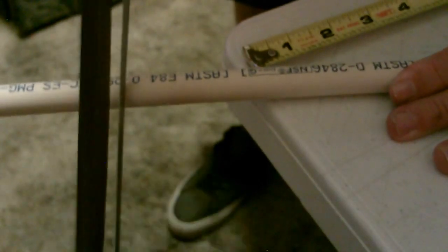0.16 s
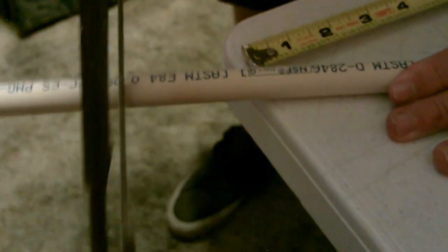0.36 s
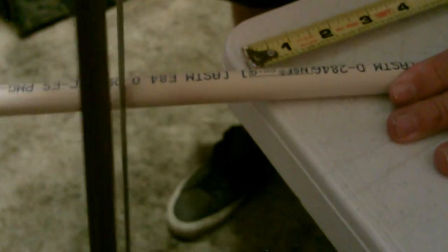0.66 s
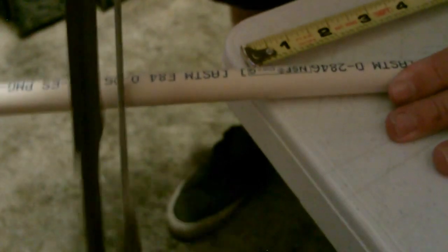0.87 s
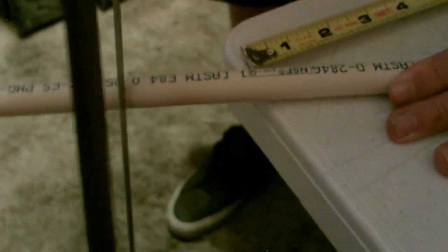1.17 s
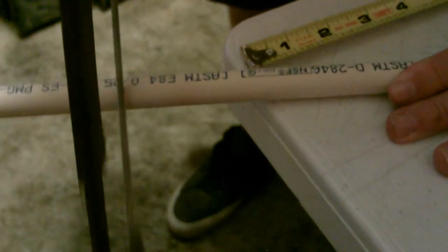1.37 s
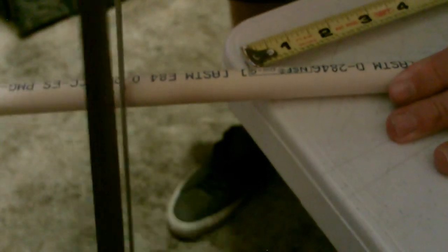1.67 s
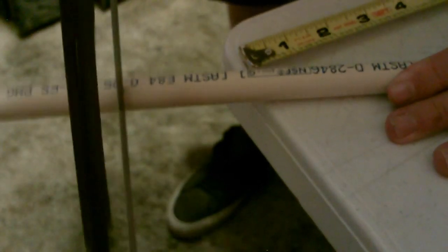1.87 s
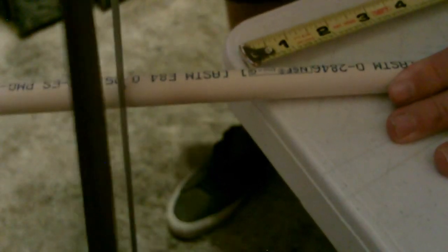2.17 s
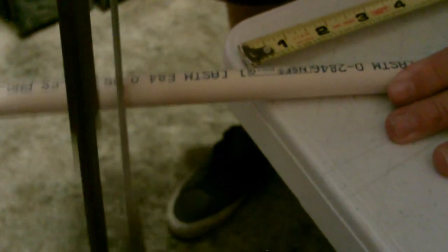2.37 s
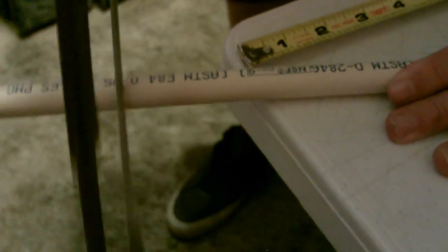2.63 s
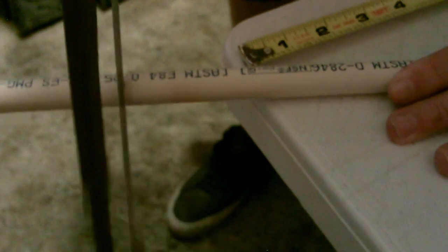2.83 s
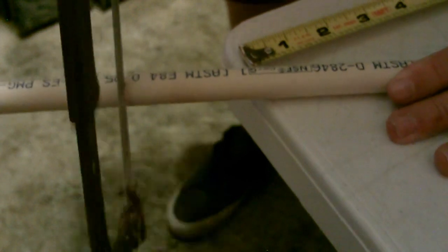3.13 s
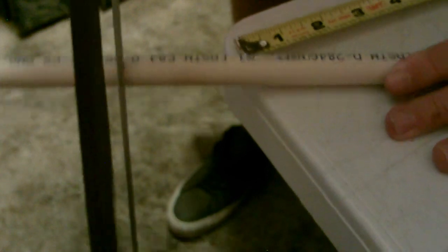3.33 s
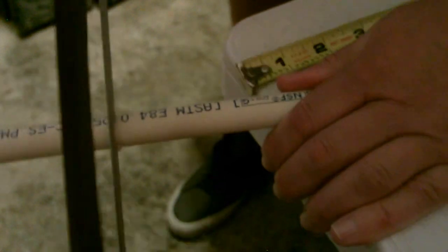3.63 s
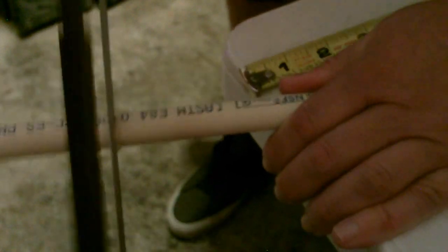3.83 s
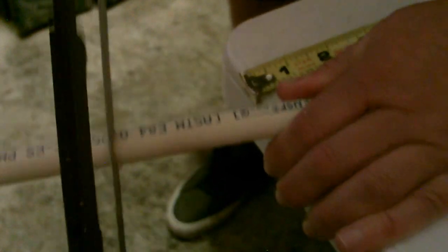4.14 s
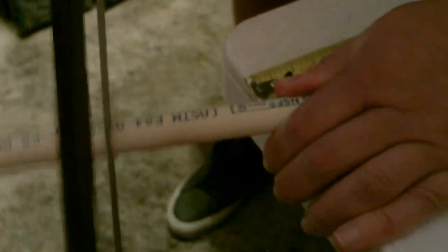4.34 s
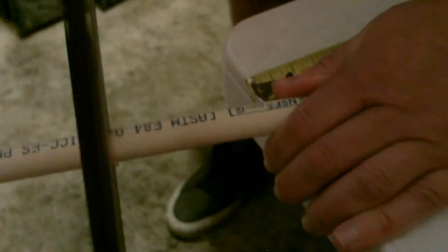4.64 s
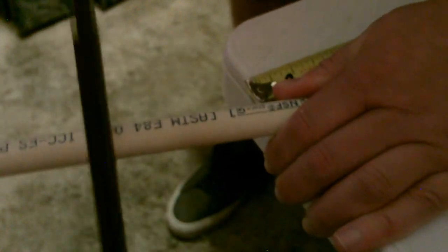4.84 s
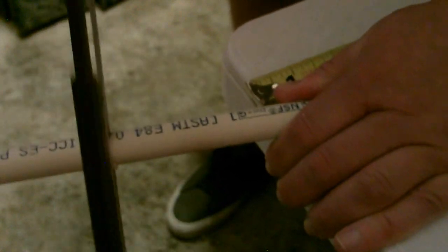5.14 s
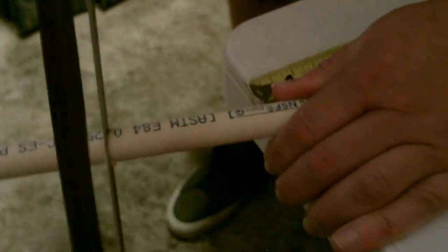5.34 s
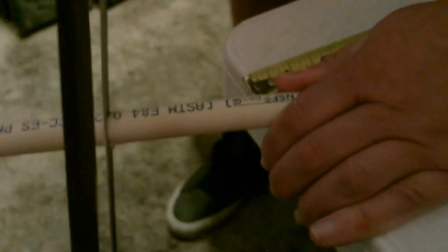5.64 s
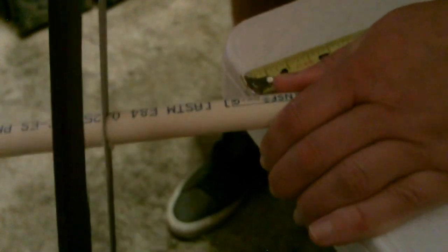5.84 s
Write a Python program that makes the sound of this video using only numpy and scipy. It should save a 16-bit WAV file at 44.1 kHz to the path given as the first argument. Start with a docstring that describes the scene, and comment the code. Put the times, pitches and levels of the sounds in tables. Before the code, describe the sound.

A fine-toothed hand saw rasps and whines back and forth through plastic pipe, then after a tiny dropout turns faster and higher.

```python
"""Hand saw on a plastic pipe

A fine-toothed hand saw cuts a thin plastic pipe held on a folding table, close to a small microphone.
Each stroke drags the teeth through the wall: a whine that follows the blade speed, over a rasp of chips.
Both ring pipe, blade and table; snags tick, brief squeaks stand out, and a faint rumble lies beneath.
After a short dropout the sound runs about 1.6 times faster and higher, with a fainter rumble."""
import sys
import numpy as np
from scipy import signal
from scipy.fft import rfft, irfft
from scipy.io import wavfile
from scipy.ndimage import uniform_filter1d

SR = 44100
rng = np.random.default_rng(int(sys.argv[2]) if len(sys.argv) > 2 else 0)


def wav_record(signal):
    """Record a signal, one row per channel, as 16-bit PCM in the file named by sys.argv[1]."""
    frames = np.transpose(np.atleast_2d(signal))
    bounded = np.clip(frames, -1, 1)
    # unit amplitude maps onto the largest positive 16-bit level
    quanta = np.round(bounded * 32767).astype(np.int16)
    wavfile.write(sys.argv[1], SR, quanta)


N = 264600
TIME = np.arange(N) / SR
HZ = np.arange(N // 2 + 1) * SR / N
DROPOUT_START_S, DROPOUT_END_S = 3.4115, 3.4512
SPEED_UP = 1.589  # how many times higher the ringing and the rumble sound after the dropout


def undb(db):
    """Turn decibels into a gain."""
    return 10 ** (np.asarray(db) / 20)


def unit(x):
    """Scale a sound to an average (rms) level of 1."""
    return x / np.sqrt(np.mean(x ** 2))


def walk(rate):
    """Wander at random: steps lasting 1 / rate seconds, smoothed twice, with a spread near 1."""
    hold = int(SR / rate)
    steps = np.repeat(rng.standard_normal(N // hold + 1), hold)
    smooth = uniform_filter1d(uniform_filter1d(steps, hold), hold)
    return 1.3 * smooth[:N]


def saw():
    """Teeth, chips and snags shake the body, which rings differently on push and pull."""
    level_db, tooth_hz, push, whine, treble_db, bass_db = strokes()
    bite, phase = teeth(tooth_hz)
    contact = rasp(phase) + scrape(phase) + whine * bite
    # a stronger whine must not make the whole stroke louder
    force = contact * undb(level_db) / np.sqrt(1 + whine ** 2)
    spectrum = rfft(force)
    low = irfft(spectrum / (1 + (HZ / 1150) ** 6), N)
    high = irfft(spectrum / (1 + (4200 / (HZ + 1)) ** 6), N)
    force = force + low * (undb(bass_db) - 1) + high * (undb(treble_db) - 1) + snags()
    # share the force between pull, push, fast pull and fast push
    fast = TIME > DROPOUT_START_S
    shares = ((1 - push) * ~fast, push * ~fast, (1 - push) * fast, push * fast)
    sound = np.zeros(N)
    for kind, share in enumerate(shares):
        response = ringing(column=2 + kind, speed=SPEED_UP if kind > 1 else 1)
        sound += signal.fftconvolve(force * share, response)[:N]
    return sound


def strokes():
    """Move the blade to and fro: give level, tooth rate, push, whine, treble and bass over time."""
    # one row per stroke, pull and push in turn: turn of the blade t/s, level/dB,
    # swell from the bite to the end of the hold/dB, top tooth rate f/Hz,
    # whine against the rasp at top speed/dB, bass before the speed correction/dB
    stroke_rows = [(-0.08, -35, -2.5, 1162, -23, -0.5), (0.033, -32.5, 6.5, 1260, -5, -4),
                   (0.165, -34.5, -1.5, 1615, -28, 7), (0.293, -31.5, 1, 1278, -6.5, -2),
                   (0.417, -32, -3, 1372, -15, 7), (0.544, -30.5, 4, 1298, -6, -0.5),
                   (0.674, -32, -3.5, 1561, -14, 7), (0.802, -29, 7, 1485, -10.5, 1.5),
                   (0.928, -30, -1, 1611, -7.5, 5.5), (1.05, -28.5, 3, 1440, -6, 0),
                   (1.173, -32.5, -2, 1564, -8, 7), (1.291, -30.5, 4, 1377, -9, 4),
                   (1.423, -35, -1, 1600, -9, 10.5), (1.552, -36.5, 4.5, 1650, -28, 5.5),
                   (1.671, -30, 0.5, 1590, -3.5, 3), (1.801, -34.5, 2.5, 1318, -14, 6),
                   (1.922, -32, 2.5, 1530, -15, 5), (2.05, -32.5, 6, 1469, -15, 8.5),
                   (2.173, -31.5, 2.5, 1617, -8, 7.5), (2.304, -32, 9, 1607, -3, 0),
                   (2.42, -31, 3.5, 1607, -4, 4), (2.555, -29.5, 2.5, 1566, -1, -0.5),
                   (2.68, -32, 4.5, 1626, -4.5, 5), (2.819, -30, 2, 1549, -6, 0.5),
                   (2.949, -30.5, 3.5, 1655, -4, 4.5), (3.082, -29.5, 6.5, 1578, -1.5, -2.5),
                   (3.21, -31, 7.5, 1657, -3, 3), (3.343, -32.5, 9.5, 1151, -10, 10.5),
                   (3.43, -41.5, -5, 2649, 1, 13), (3.496, -32.5, 5, 1844, -16, 6),
                   (3.586, -36, 5.5, 1792, -6.5, 4), (3.666, -27, -1, 2545, -14, 10.5),
                   (3.751, -31.5, 7.5, 1906, -3, 2), (3.827, -24, -2.5, 2435, -21, 5.5),
                   (3.91, -31, 2, 2580, -14, 2), (3.983, -27.5, -0.5, 2540, -24, 7.5),
                   (4.066, -33.5, 9.5, 2085, -6, 3), (4.15, -29.5, -1.5, 2571, -22, 11),
                   (4.236, -34, -0.5, 1845, -19, 7.5), (4.311, -30.5, -0.5, 2395, -10.5, 7),
                   (4.399, -36, -3, 1826, -17, 8), (4.486, -29, 2, 1827, -11, 6.5),
                   (4.58, -32, 2, 2042, -10, 4.5), (4.655, -27, 1, 2390, -7.5, 9),
                   (4.746, -31, 2.5, 2248, -8.5, 4.5), (4.816, -27.5, 0.5, 2542, -9.5, 11),
                   (4.908, -32.5, 0.5, 2169, -7, 5), (4.98, -27.5, 1.5, 2607, -16, 6.5),
                   (5.067, -33, -2.5, 2137, -2, 5), (5.139, -30.5, 6, 2394, -21, 4),
                   (5.225, -31.5, 3, 2063, -4, 8), (5.306, -28, 0, 2410, -7.5, 5.5),
                   (5.39, -30.5, -1, 2070, -3, 0), (5.469, -33, -1, 1787, -11, 11.5),
                   (5.559, -40, -8.5, 1512, -33, 3), (5.662, -36.5, 8, 1490, -5, 10.5),
                   (5.775, -37.5, 3, 1496, -26, 11.5), (5.857, -33.5, 2.5, 1766, -23, 12),
                   (5.946, -35.5, 8, 1810, -11, 8.5), (6.04, -40, 2, 1512, -8, -2)]
    # shape shared by a kind of stroke; rows pull, push, fast pull, fast push:
    # ends of bite, hold and let-go (shares of the stroke), arch in mid hold/dB, sag at the let-go/dB,
    # depth of the turn/dB, lateness of the top speed (exponent), treble/dB
    kind_rows = [(0.19, 0.63, 0.79, 0.99, -4, -18, 0.75, 0.75),
                 (0.22, 0.62, 0.8, 0.79, -7, -19.5, 1.05, 0.078),
                 (0.21, 0.57, 0.77, 0.88, -5.5, -20, 0.88, 0.1),
                 (0.21, 0.54, 0.78, 0.7, -4, -22.5, 0.95, 0.4)]
    # slow drift of the treble: t/s, level added/dB
    treble_drift = [(0, -2), (0.6, -2), (1.2, 0), (1.7, 2), (2.4, 1.5), (3.3, 1.5), (3.85, -3), (4.2, -0.2),
                    (5.3, 0.05), (5.6, -1), (6, 0.3)]
    low_point_s = 0.0028  # the level is lowest this long after each turn

    turn, level, swell, top_hz, whine_db, bass_db = np.transpose(stroke_rows)
    push = np.arange(len(turn)) % 2
    kind = push + 2 * (turn > DROPOUT_START_S)
    bite, hold, let_go, arch, sag, depth, late, treble_db = np.array(kind_rows)[kind].T
    length = np.diff(turn, append=turn[-1] + 1)
    row = np.clip(np.searchsorted(turn, TIME) - 1, 0, len(turn) - 2)

    # quiet at the turn, a quick bite, an arched hold that swells or fades, a sag as the arm slows
    mid_hold = (bite + hold) / 2
    times = turn + np.array([low_point_s + 0 * turn, bite * length, mid_hold * length,
                             hold * length, let_go * length])
    levels = level + np.array([depth, -swell / 2, arch, swell / 2, swell / 2 + sag])
    level_db = np.interp(TIME, times.T.ravel(), levels.T.ravel())

    # the blade stands still at each turn and is fastest near mid stroke; short fast strokes hold their speed
    before = TIME < DROPOUT_START_S
    place = np.clip((TIME - turn[row]) / length[row], 0, 1)
    speed = np.sin(np.pi * place ** late[row]).clip(0) ** np.where(before, .55, .4)

    def soften(column):
        """Blend the step from one stroke to the next over 400 samples."""
        return uniform_filter1d(1. * column[row], size=400)

    # a slow blade sticks and slips: the teeth bite evenly only near full speed
    whine = undb(soften(whine_db)) * speed ** np.where(before, 2.5, 5.5)
    # a faster blade sounds brighter and thinner
    drift_db = np.interp(TIME, *np.transpose(treble_drift))
    treble_db = soften(treble_db) + drift_db + 3.9 * (speed - .8)
    bass_db = soften(bass_db) - 18.5 * (speed - .8)
    return level_db, top_hz[row] * speed, soften(push).clip(0, 1), whine, treble_db, bass_db


def teeth(tooth_hz, set_db=-14):
    """Bite of the teeth, uneven in spacing and depth; their sideways set repeats every third tooth."""
    uneven_hz = tooth_hz * (1 + .012 * walk(60) + .03 * walk(900))
    phase = 2 * np.pi * np.cumsum(uneven_hz) / SR
    bite = np.zeros(N)
    for multiple, db in enumerate((0, -7, -8, -12), start=1):
        bite += undb(db + 3 * walk(80) - 1) * np.sin(multiple * phase)
    sideways = undb(set_db + 4.0 * walk(30)) * np.sin(phase / 3)
    return bite + sideways, phase


def rasp(phase, grain_db=2.0, gate=0.63, judder_db=0.97, patchy_db=3.0):
    """Chips tear off in grains of uneven size, mostly as a tooth lands; the blade judders."""
    size_db = grain_db * rng.exponential(size=N).clip(0, 5)  # the limit avoids lone clicks
    grains = rng.standard_normal(N) * undb(size_db)
    landing = 1 + np.clip(gate, 0, 1) * np.cos(phase)
    spectrum = rfft(grains * landing * undb(judder_db * walk(120)))
    # each third of an octave of the rasp swells and fades at random
    third = 3 * np.log2(HZ / 250 + 1e-6).clip(0, 6)
    chips = np.zeros(N)
    for k in range(19):
        band = irfft(spectrum * (1 - abs(third - k)).clip(0), N)
        chips += band * undb(patchy_db * walk(70))
    return unit(chips)


def scrape(phase, level_db=-15.5):
    """Teeth that catch only now and then: rough bands that glide with the tooth rate and its multiples."""
    return undb(level_db) * sum(walk(350) * np.sin(k * phase) for k in (1, 2, 3, 4))


def snags(tick_s=.0015):
    """Teeth that snag: short bursts of noise that die away at once."""
    # one row per snag: t/s, level before halving and ringing/dB
    snag_rows = [(1.001, -15), (1.122, -21), (3.147, -19), (5.162, -14), (5.656, -20.5), (5.678, -27)]
    out = np.zeros(N)
    tick = np.exp(-np.arange(400) / SR / tick_s)
    for s, db in snag_rows:
        start = int(s * SR)
        out[start:start + len(tick)] += undb(db) * tick * rng.standard_normal(400) / 2
    return out


def ringing(column, speed):
    """Ring of pipe, blade and table: all resonances together, evened out in level over the middle band."""
    # one row per resonance, before any speed-up: f/Hz, width setting/Hz,
    # then relative level/dB on pull, push, fast pull and fast push
    body_rows = [(306.6, 61, -21.5, -29, -21.5, -26), (501.7, 58, -19, -11.5, -16, -20.5),
                 (618, 72, -11.5, -42, -15, -10.5), (833, 77, -12, -9, -5.5, -32.5),
                 (923.3, 19.5, -23, -22, -20, 0), (1015.4, 181, -2.5, -5.5, -1, -1.5),
                 (1346, 21, -28, -21, 1, -28), (1322, 66, 1, 0, -15, -16), (1556, 500, -5.5, -6.5, 0, 0.5),
                 (1561.5, 28, -2.5, -4, -15, 4.5), (1958, 76, 3.5, -2, -26, -24),
                 (2005, 496, -4, -3, 3, -2.5), (2244, 263, 1.5, -3, -22, 0), (2304, 50, -18, -20, -15, 0.5),
                 (2450, 2000, -60, -8.5, -4, -39.5), (3020, 37, 3, 4.5, -18, -22),
                 (2963, 480, -1, -4.5, -27, -9), (3274, 254, -2, -1.5, -2, -8),
                 (3656, 120, -1.5, -18, -62, -60), (3823, 730, -7, -5.5, -5.5, -8.5),
                 (4680, 140, -8.5, -3, -23, -35), (4860, 960, -11, -3.5, -10.5, -12.5),
                 (5260, 1000, -60, -12, -6.5, -37), (5840, 910, -8, -5.5, -13, -15),
                 (6060, 270, -9.5, -2.5, -10, -27.5), (6810, 750, -12, -6.5, -6, -13.5),
                 (7660, 1600, -22.5, -15.5, -16, -19.5), (8740, 880, -19, -17, -19, -35),
                 (9130, 860, -22, -15, -15, -20), (10240, 780, -26.5, -60, -60, -60),
                 (11260, 1900, -25, -19, -60, -60), (12300, 1140, -34, -63, -60, -60),
                 (14900.0, 2500, -30, -28, 0, 1)]
    grid = np.arange(1, 2050) * SR / 4096
    power = np.zeros(len(grid))
    for mode in body_rows:
        hz, width = mode[0], mode[1]
        detuning = hz / width * (grid / (hz * speed) - hz * speed / grid)
        power += undb(mode[column]) ** 2 / (1 + detuning ** 2) ** 2
    middle = (grid > 800) & (grid < 4200)
    power = power / power[middle].sum() * len(grid)
    # fold the cepstrum (the spectrum of the log spectrum) so that the ring starts at once
    cepstrum = irfft(np.log(power + 1e-7) / 2)
    cepstrum[1:2048] *= 2
    cepstrum[2049:] = 0
    return irfft(np.exp(rfft(cepstrum)))


def squeaks(rise_s=0.0021, fall_s=0.0053, flutter=0.012, middle_hz=2500, longer=0.55):
    """Brief tones that swell, bend in pitch and die within milliseconds; low ones last longer."""
    # one row per squeak: t/s, pitch before the bend f/Hz, level before the fade trims it/dB
    squeak_rows = [(0.326, 2024, -19.5), (0.58, 1940, -35.5), (0.762, 1030, -27.5), (0.877, 2910, -24),
                   (0.89, 2263, -20.5), (0.993, 1600, -21), (1.02, 1030, -28), (1.12, 5010, -22),
                   (1.223, 3160, -21.5), (1.262, 1051, -28), (1.37, 5037, -20.5), (1.512, 1031, -29),
                   (1.732, 1557, -16.5), (1.738, 2900, -18), (1.97, 2930, -15), (2.011, 1020, -24),
                   (2.095, 478.7, -32.5), (2.118, 5942, -21), (2.211, 1380, -22), (2.265, 1039, -27.5),
                   (2.368, 4740, -20), (2.371, 5917, -21.5), (2.492, 3325, -22), (2.604, 6110, -19.5),
                   (2.624, 1541, -22.5), (2.745, 3150, -20), (2.781, 1032, -24), (2.873, 6110, -17.5),
                   (2.88, 4626, -19), (2.99, 1336, -19), (3.021, 3187, -22), (3.144, 4720, -20),
                   (3.259, 3226, -17.5), (3.284, 1557, -20.5), (3.534, 2470, -18.5), (3.708, 2262, -19.5),
                   (3.87, 2355, -19), (3.855, 3700, -23), (4.019, 2280, -23), (4.025, 3320, -22),
                   (4.548, 3397, -20.5), (4.691, 2330, -16.5), (4.718, 3272, -19.5), (4.851, 2538, -23),
                   (4.876, 3215, -18.5), (5.038, 3645, -18.5), (5.16, 1680, -22.5), (5.16, 3398, -18.5),
                   (5.176, 2310, -24), (5.361, 3660, -18.5)]
    out, t = np.zeros(N), TIME[:3000]
    for s, hz, db in squeak_rows:
        turn, bend = rng.standard_normal(2)
        u = t * min(hz / middle_hz, 1) ** longer  # time runs slower for low squeaks
        swell = (u / rise_s / 2) ** 2 * np.exp(2 - u / rise_s)
        fade = np.exp(-(u / (rise_s + 2 * fall_s)) ** 2)
        bent_t = t * (1 + flutter * bend * (u / fall_s - 1))
        tone = np.sin(2 * np.pi * (hz * bent_t + turn))
        start = int(s * SR)
        out[start:start + len(t)] += undb(db) * swell * fade * tone
    return out


def rumble(before_db=-61.5, after_db=-68):
    """Low noise with a few narrow humps, gently wavering; higher and fainter after the dropout."""
    # spectrum before the speed-up: f/Hz, relative level per Hz/dB
    rumble_rows = [(12, -53), (20, -26), (49, -36), (119, -21), (163, -26), (213, -21), (274, -7.5),
                   (398, -20), (483, -6), (505, 0.5), (552, -9.5), (612, 4), (700, -19), (910, -52),
                   (1540, -120)]
    hz, db = np.transpose(rumble_rows)
    white = rfft(rng.standard_normal(N))

    def shaped(speed):
        """Colour the noise, with all its humps moved up by speed."""
        colour_db = np.interp(np.log(HZ / speed + 1), np.log(hz), db, right=-90)
        return unit(irfft(white * undb(colour_db), N))

    before, after = shaped(1) * undb(before_db), shaped(SPEED_UP) * undb(after_db)
    noise = np.where(TIME < DROPOUT_START_S, before, after)
    return noise * undb(3.0 * walk(6.74))


def scene(echo_t60_s=0.19, echo_db=-14):
    """The saw and its squeaks, their short echo from the surroundings (a fading noise tail), and the rumble."""
    near = saw() + squeaks()
    t = TIME[:SR // 2]
    tail = rng.standard_normal(len(t)) * undb(-60 * t / echo_t60_s) * (t > .004)
    echo = signal.fftconvolve(near, tail / np.sqrt(np.sum(tail ** 2)))[:N]
    return (near + undb(echo_db) * echo + rumble())[None]


def record(dry, top_hz=15800):
    """The sound drops out for a moment; the top is cut steeply."""
    dropout = (TIME > DROPOUT_START_S) & (TIME < DROPOUT_END_S)
    on = uniform_filter1d(np.where(dropout, undb(-55), 1), size=40)
    top_cut = signal.ellip(10, .2, 75, top_hz, fs=SR, output="sos")
    return signal.sosfilt(top_cut, dry * on)


dry = scene()
out = record(dry)
wav_record(out)
```